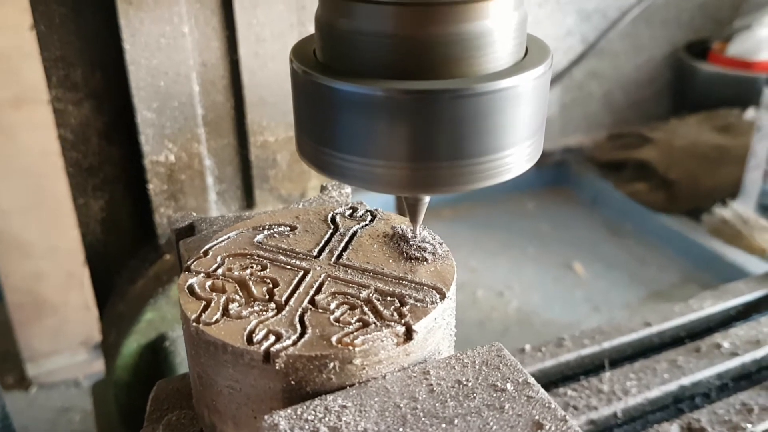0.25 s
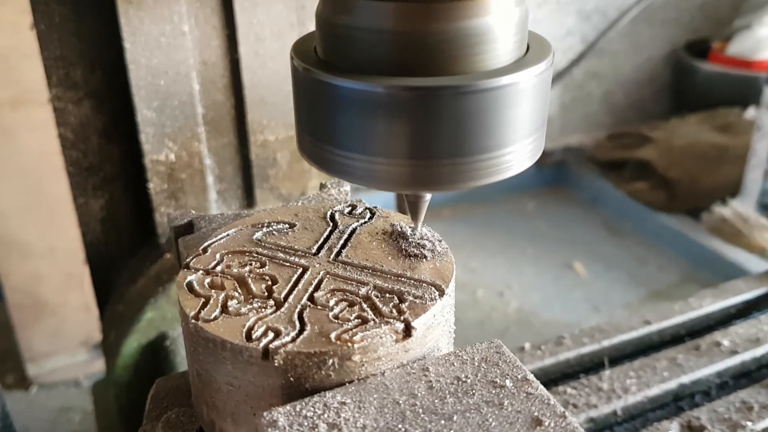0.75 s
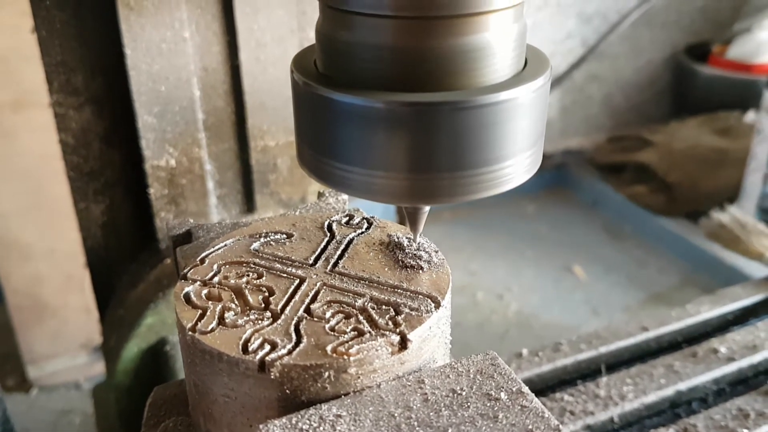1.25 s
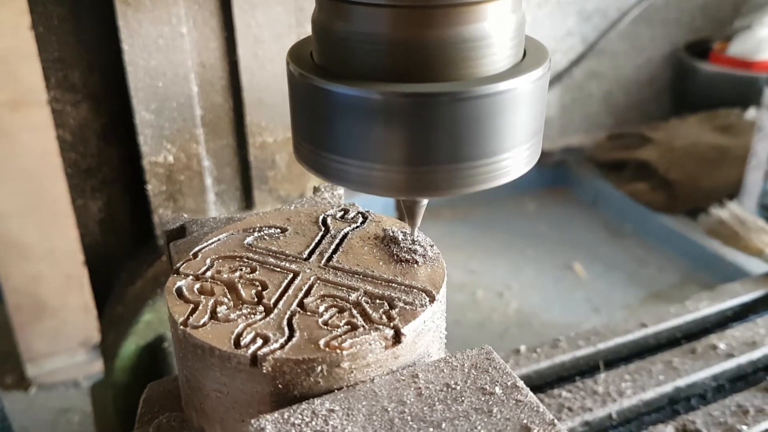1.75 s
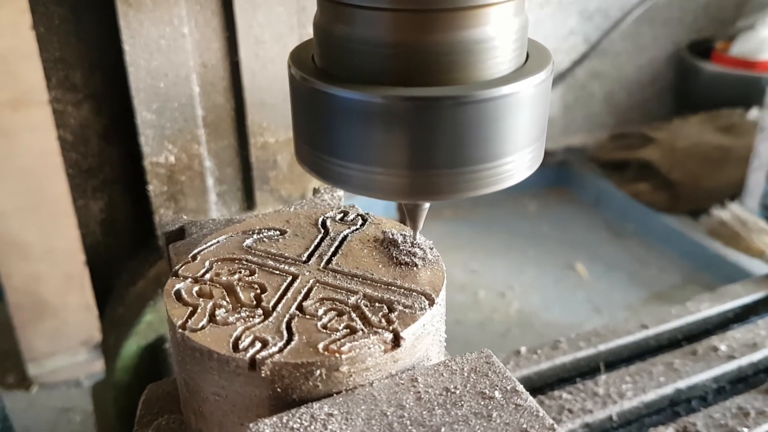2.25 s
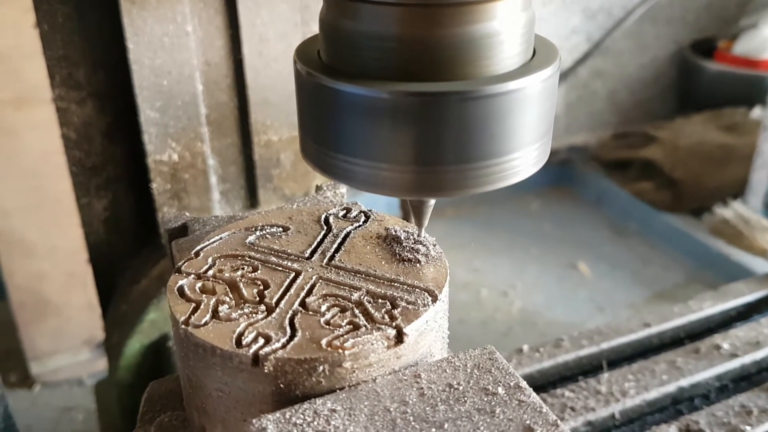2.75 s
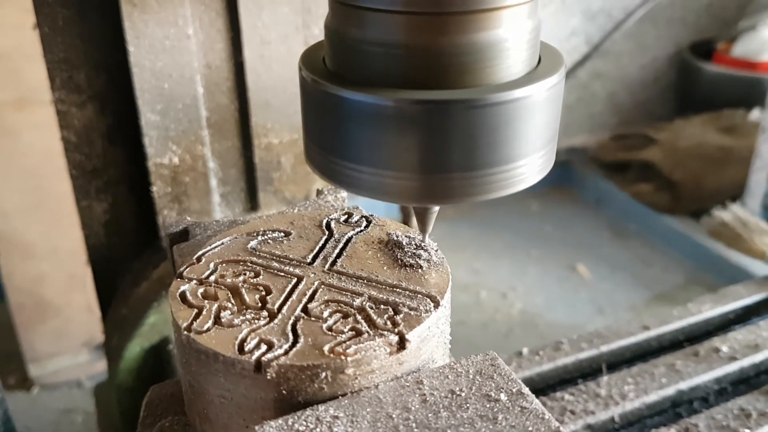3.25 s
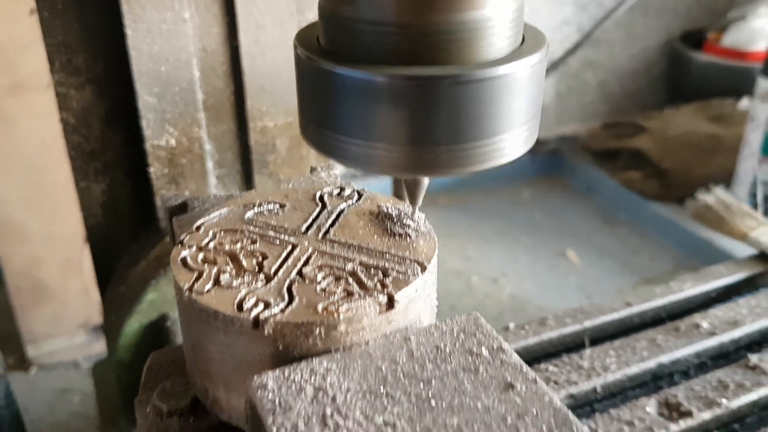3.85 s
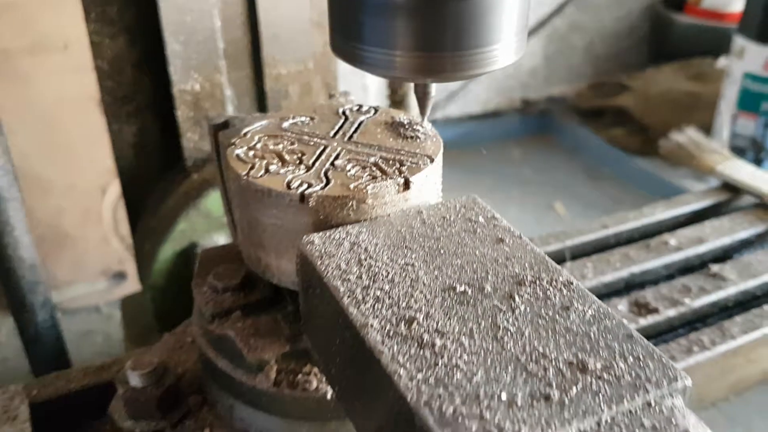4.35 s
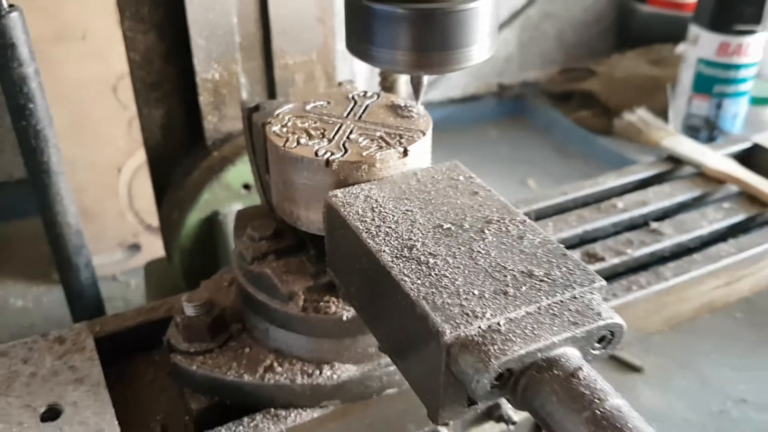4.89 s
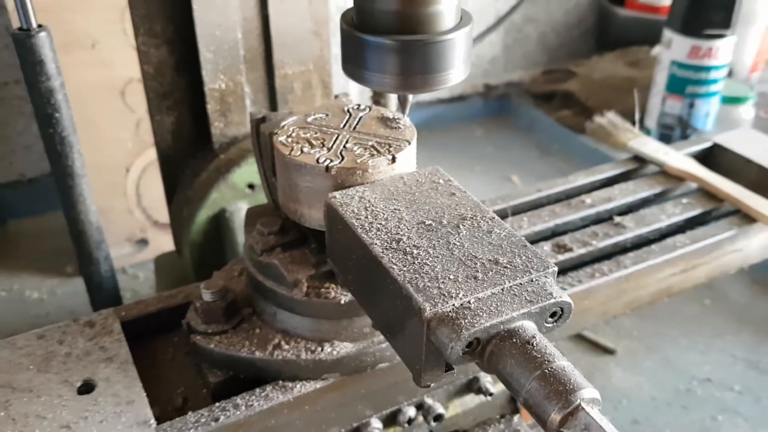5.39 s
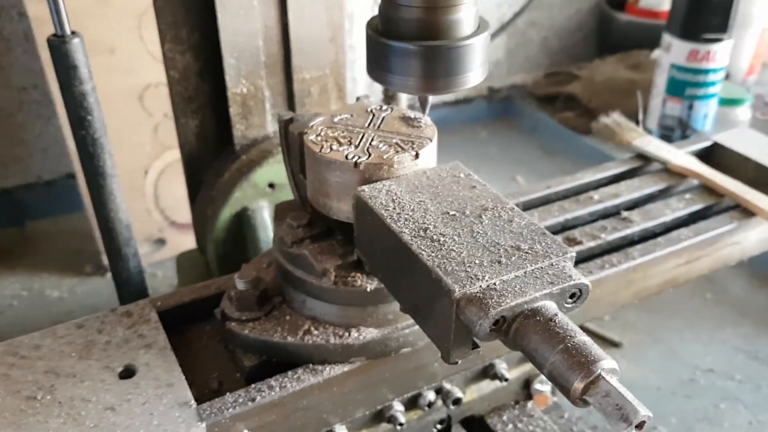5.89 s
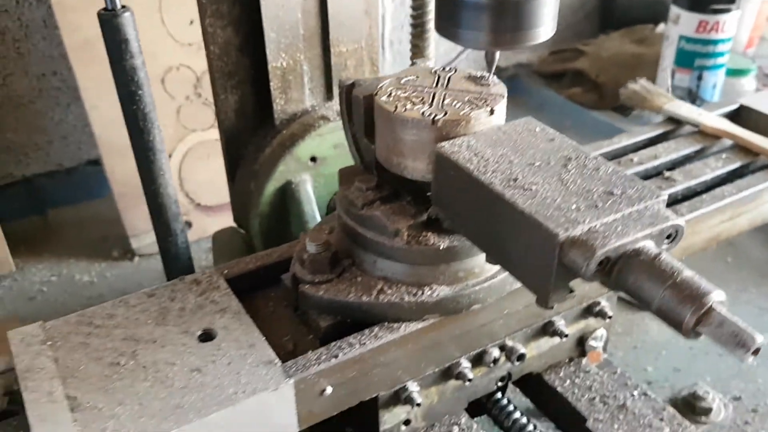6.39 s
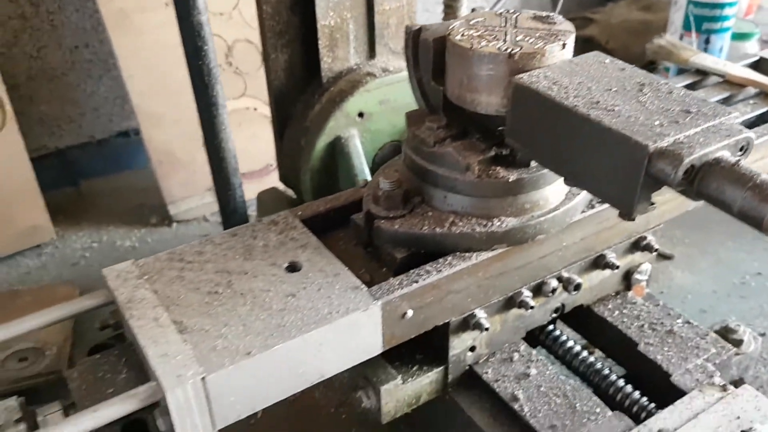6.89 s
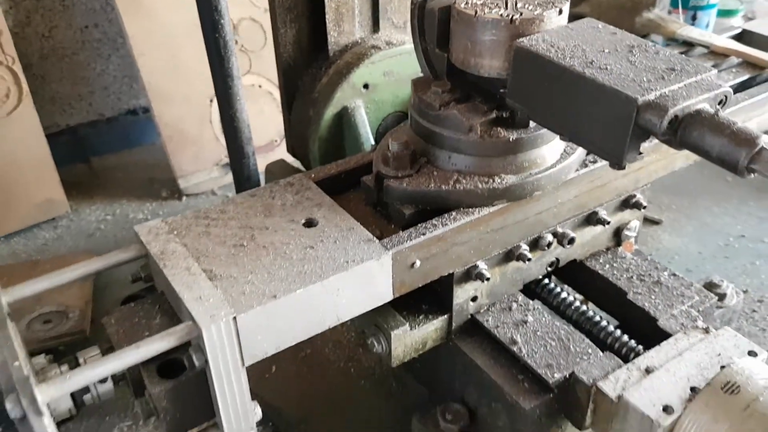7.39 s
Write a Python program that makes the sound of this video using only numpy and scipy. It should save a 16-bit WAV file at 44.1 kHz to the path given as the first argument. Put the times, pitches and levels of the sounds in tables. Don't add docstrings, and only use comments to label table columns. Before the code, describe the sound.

Close machine drone in a small workshop: ringing spindle gears, low hum, fluttering high cutter squeal, shifting as the listener backs away, ending with rattling knocks.

```python
import sys
import numpy as np
from scipy import signal
from scipy.fft import irfft
from scipy.io import wavfile
from scipy.ndimage import uniform_filter1d, map_coordinates

SR = 44100
rng = np.random.default_rng(int(sys.argv[2]) if len(sys.argv) > 2 else 0)


def gain_from_decibels(decibels):
    exponent = np.asarray(decibels, float) / 20
    return 10 ** exponent


def to_wav(s):
    ch = np.atleast_2d(s).T
    pcm = np.round(np.clip(ch, -1, 1) * 32767)
    wavfile.write(sys.argv[1], SR, pcm.astype(np.int16))


N = 336483

MESH_HZ, SHAFT_HZ = 329.3, 28.0
WALK_S = 3.5


def evened(x):
    return x / np.sqrt(np.mean(x ** 2) + 1e-20)


def read(points, hz):
    f, value = np.transpose(points)
    return np.interp(np.log(hz + 1), np.log(f + 1), value)


def curves(rows, t):
    s, *columns = np.transpose(rows)
    return [np.interp(t, s, c) for c in columns]


def spells(rows, t, edge_s):
    gates = []
    for a, b, value in rows:
        gate = np.interp(t, [a - edge_s, a + edge_s, b - edge_s, b + edge_s], [0, 1, 1, 0])
        gates.append((gate, value))
    return gates


def wander(hz, t, count=12):
    f = np.geomspace(hz / 8, hz, count)[:, None]
    phase = rng.random((count, 1))
    few = np.linspace(0, t[-1], num=1500)
    waves = np.sin(2 * np.pi * (f * few + phase)) / np.sqrt(f)
    return np.interp(t, few, evened(waves.sum(0)))


def sine(turns):
    return np.sqrt(2) * np.cos((2 * np.pi * (turns % 1)).astype(np.float32))


def spindle_time(t):
    # time in seconds, offset in parts per thousand.
    speed_drift = [(0.0, -0.14), (0.7, -0.046), (1.4, -0.027), (2.0, -0.15), (2.5, 0.039), (2.95, 0.033),
                   (3.15, 0.121), (3.4, 0.465), (3.7, -0.088), (4.1, 0.166), (4.5, 0.308), (4.9, 0.096),
                   (5.3, 0.492), (5.7, 0.571), (6.2, 1.154), (6.7, 1.225), (7.2, 1.189), (7.63, 0.641)]
    hunting = 0.14 * np.cos(2 * np.pi * 0.8 * (t - 1.6))
    hunting = hunting * np.clip(1 + WALK_S - t, 0, 1)
    return np.cumsum(1 + (curves(speed_drift, t)[0] + hunting) / 1000) / SR


def gears(t):
    # pitch in Hz, delay left and right in ms, slip left and right in Hz while walking.
    strong_tones = [(630.7, 1.375, 1.575, -0.02, 0.0), (686.63, 1.03, 0.813, -0.06, -0.08),
                    (1618.67, 0.495, 0.458, -0.01, -0.17), (1621.48, 0.513, 0.494, -0.06, 0.04),
                    (1674.6, 0.48, 0.289, 0.02, 0.29), (1677.48, 0.251, 0.034, -0.12, 0.2),
                    (1730.55, 0.38, 0.562, -0.01, -0.09), (1947.98, 0.067, 0.075, -0.06, -0.1),
                    (2333.25, 0.103, 0.032, -0.01, -0.1), (2606.64, 0.277, 0.218, -0.13, 0.09),
                    (2662.58, 0.114, 0.172, -0.19, 0.14), (3180.69, 0.102, 0.211, -0.15, -0.11),
                    (3265.31, 0.139, 0.02, -0.17, -0.07), (3321.24, 0.123, 0.126, -0.04, 0.07),
                    (3377.19, 0.087, 0.283, -0.2, -0.21), (3405.85, 0.172, 0.263, -0.28, -0.13),
                    (2003.95, 0.229, 0.065, 0.37, 0.06), (2277.31, 0.306, 0.192, 0.05, -0.07),
                    (2935.96, 0.204, 0.158, -0.05, 0.02), (3356.29, 0.183, 0.084, -0.27, -0.11),
                    (4967.86, 0.171, 0.125, 0.13, -0.2)]
    # level in dB, echo strength (0-1), seconds of walking until
    # the echo cancels it, seconds between cancellings, trend in dB per second.
    left_ear = [(-29.0, 0.22, 0.52, 1.23, -2.0), (-34.6, 0.25, 0.53, 4.06, 2.0),
                (-32.9, 0.17, 0.78, 1.9, -0.8), (-44.0, 0.49, 1.96, -4.24, 1.4),
                (-29.4, 0.44, 0.68, -4.36, -2.7), (-35.6, 0.45, 1.11, -4.51, -2.9),
                (-42.8, 0.48, 1.83, 2.88, -0.9), (-41.3, 0.9, 3.27, 8.33, 0.3),
                (-27.4, 0.54, 0.55, 6.75, -4.4), (-33.5, 0.46, 0.97, 2.2, -0.9),
                (-33.1, 0.66, 1.37, 2.44, -0.0), (-28.0, 0.56, 1.34, 8.33, -2.9),
                (-42.1, 0.47, 4.07, -8.33, 1.1), (-27.9, 0.9, 2.48, -8.33, 2.3),
                (-43.1, 0.56, 2.43, -2.67, -1.6), (-42.5, 0.67, 2.54, 3.73, -0.1),
                (-46.9, 0.49, 1.44, -1.76, -1.9), (-39.4, 0.75, 1.78, 5.29, -1.9),
                (-39.6, 0.69, 2.4, 8.33, -1.4), (-39.7, 0.38, 1.2, 1.29, -2.5),
                (-56.5, 0.7, 0.39, 1.84, 0.1)]
    right_ear = [(-30.2, 0.2, 0.5, 1.23, -0.6), (-30.6, 0.44, 2.0, 3.83, -0.3),
                 (-36.1, 0.94, 1.47, 7.14, -0.3), (-34.5, 0.44, 0.67, 2.16, 2.2),
                 (-40.0, 0.32, 1.2, -1.43, 3.0), (-34.1, 0.86, 0.69, 8.33, -2.0),
                 (-38.6, 0.68, 2.78, 3.57, -3.4), (-43.0, 0.72, 3.46, 8.33, -1.4),
                 (-35.7, 0.95, 1.06, 1.39, -1.6), (-23.8, 0.2, 2.75, 2.85, -1.4),
                 (-24.4, 0.25, 2.5, -2.73, -2.1), (-39.0, 0.57, 3.66, -8.33, 2.7),
                 (-28.9, 0.26, 2.56, -3.0, -2.8), (-25.9, 0.97, 0.65, 8.33, -0.3),
                 (-30.4, 0.4, 0.87, 1.14, -4.8), (-29.4, 0.39, 0.67, 2.6, -1.6),
                 (-47.9, 0.86, 3.0, 8.33, 2.1), (-39.1, 0.44, 1.35, 3.24, -1.4),
                 (-46.0, 0.47, 1.08, -2.33, 1.2), (-30.1, 0.57, 0.67, 6.13, -5.0),
                 (-42.9, 0.65, 1.84, -8.33, -0.7)]
    # strength (0-1), seconds of walking until # it cancels,
    # seconds between cancellings.
    left_far_wall = [(0.3, 0.07, 0.92), (0.15, 0.99, 1.52), (0.11, 1.33, -1.42), (0.51, 1.1, 1.65),
                     (0.2, 1.38, -1.9), (0.29, 1.34, 2.06), (0.32, 0.87, 1.57), (0.28, 1.62, 2.12),
                     (0.28, 1.06, 1.49), (0.4, 1.7, -2.15), (0.19, 0.56, 0.85), (0.17, 1.25, 1.78),
                     (0.29, 1.33, 2.31), (0.14, 1.42, 1.53), (0.84, 1.85, 5.0), (0.31, 0.55, -1.17),
                     (0.81, 0.8, 5.0), (0.53, 1.77, 1.91), (0.17, 0.2, -1.1), (0.43, 2.24, 4.42),
                     (0.7, 1.41, -1.58)]
    right_far_wall = [(0.31, 0.02, 0.95), (0.17, 2.15, -2.61), (0.9, 1.18, 1.97), (0.13, 1.79, -1.84),
                      (0.52, 3.22, -4.12), (0.63, 2.73, -4.03), (0.34, 1.29, 1.54), (0.71, 1.44, 2.2),
                      (0.3, 0.54, -1.53), (0.11, 0.62, -0.8), (0.24, 2.4, 3.55), (0.45, 1.27, 2.46),
                      (0.25, 0.19, 1.29), (0.75, 2.35, -5.0), (0.48, 0.78, 3.38), (0.21, 0.12, -1.6),
                      (0.9, 1.75, 2.87), (0.22, 0.68, -1.37), (0.57, 0.37, 2.05), (0.18, 0.72, 0.83),
                      (0.21, 1.32, 1.33)]
    # time in seconds, level in dB.
    cutting_load = [(0, -0.5), (3.3, 1), (3.9, .8), (4.3, 5), (4.7, 2.5), (5.3, -9.5), (6, 2), (6.35, 3.5),
                    (7, 1.5), (7.3, -4.5), (7.63, -8)]
    # start and end in seconds,
    # moment in step in seconds, beats per second, level in dB.
    whine_beats = [
        (-.1, 2.85, 1.47, 1.03, -38.5),
        (5.65, 6.3, 5.99, 5.2, -34.5),
    ]

    shaft_t = spindle_time(t)
    coarse = t[::256]
    walked = np.maximum(coarse - WALK_S, 0)
    load, = curves(cutting_load, coarse)
    pair = 0.18 * load + 2.5 * np.clip(1 - coarse / 3.3, 0, 1)
    load_db = {0: 1.53 - 0.43 * load, 13: load, 2: pair, 3: pair, 8: 0.9 * walked}

    out = np.zeros((2, N))
    left, right = zip(left_ear, left_far_wall), zip(right_ear, right_far_wall)
    for number, ((hz, *path), *ears) in enumerate(zip(strong_tones, left, right)):
        delays_ms, slips_hz = path[:2], path[2:]
        for ear, ((db, *floor, trend_db), wall) in enumerate(ears):
            paths = 1
            for echo, null_s, every_s in (floor, wall):
                paths = paths - echo * np.exp(2j * np.pi * (walked - null_s) / every_s)
            lead = np.unwrap(np.angle(paths)) / (2 * np.pi)
            lead = lead + slips_hz[ear] * walked - hz * delays_ms[ear] / 1000
            level_db = db + 0.9 + trend_db * walked + load_db.get(number, 0)
            gain = abs(paths) * gain_from_decibels(level_db + 0.4 * wander(5.0, coarse))
            out[ear] += np.interp(t, coarse, gain) * sine(hz * shaft_t + np.interp(t, coarse, lead))
    for a, b, step_s, beats, db in whine_beats:
        gate = spells([(a, b, db)], t, 0.12)[0][0]
        out += gate * gain_from_decibels(db) * sine(strong_tones[0][0] * shaft_t + beats * (t - step_s))
    return out + sidebands(shaft_t, np.maximum(t - WALK_S, 0))


def sidebands(shaft_t, walked):
    # pitch in Hz, level left and right in dB,
    # delay left and right in ms.
    faint_low = [(503.76, -42.1, -42.0, 1.765, 1.781), (521.17, -45.1, -45.1, 1.623, 1.661),
                 (530.93, -41.4, -39.0, 0.429, 0.433), (571.81, -44.4, -45.3, 1.079, 1.072),
                 (612.6, -44.6, -45.8, 0.291, 0.292), (658.61, -39.9, -40.7, 0.775, 0.871),
                 (687.8, -50.2, -44.2, 1.229, 1.015), (741.38, -49.5, -47.2, 0.13, 0.293),
                 (742.56, -47.5, -44.9, 0.588, 0.502), (761.23, -51.2, -44.6, 0.873, 1.143),
                 (824.82, -45.1, -46.4, 0.903, 1.122), (1015.93, -45.5, -49.5, 0.635, 0.955),
                 (1452.15, -47.0, -46.9, 0.179, 0.175), (1512.62, -43.8, -55.5, 0.498, 0.532),
                 (1592.7, -41.9, -40.1, 0.564, 0.501), (1702.55, -47.5, -45.9, 0.348, 0.244),
                 (1715.42, -46.6, -46.9, 0.058, 0.327), (1759.25, -43.9, -44.1, 0.215, 0.513),
                 (1762.11, -46.2, -47.5, 0.409, 0.14), (1931.01, -47.6, -47.9, 0.359, 0.293),
                 (1951.36, -49.4, -46.5, 0.443, 0.505), (1973.32, -50.2, -46.6, 0.339, 0.187),
                 (2249.38, -48.6, -47.3, 0.383, 0.159), (2281.34, -47.8, -45.6, 0.399, 0.303),
                 (2354.69, -42.9, -43.6, 0.028, 0.032), (2545.38, -46.2, -48.5, 0.078, 0.303),
                 (2550.68, -56.4, -43.8, 0.056, 0.26), (2578.69, -61.8, -40.6, 0.328, 0.275),
                 (2593.99, -44.1, -38.6, 0.189, 0.176), (2608.38, -51.4, -46.2, 0.236, 0.2),
                 (2621.75, -44.7, -43.1, 0.266, 0.266), (2637.14, -48.0, -39.9, 0.269, 0.259),
                 (2647.49, -50.0, -42.9, 0.324, 0.308), (2667.26, -49.6, -44.0, 0.292, 0.367),
                 (2691.23, -54.2, -41.9, 0.294, 0.332)]
    faint_upper = [(2693.08, -43.6, -41.6, 0.062, 0.169), (2703.43, -45.2, -46.0, 0.168, 0.277),
                   (2718.57, -41.1, -44.9, 0.33, 0.145), (2734.55, -43.0, -43.7, 0.046, 0.227),
                   (2769.2, -47.1, -42.6, 0.117, 0.116), (2770.55, -52.4, -45.4, 0.136, 0.008),
                   (2941.13, -40.5, -46.1, 0.083, 0.059), (2991.85, -49.2, -48.0, 0.183, 0.086),
                   (2997.15, -45.0, -58.6, 0.268, 0.187), (3008.0, -47.9, -41.3, 0.322, 0.043),
                   (3124.75, -47.0, -50.7, 0.167, 0.056), (3209.37, -45.7, -42.8, 0.008, 0.182),
                   (3224.43, -50.2, -46.3, 0.28, 0.119), (3236.63, -43.0, -42.3, 0.283, 0.105),
                   (3250.92, -45.4, -53.0, 0.138, 0.254), (3271.11, -48.9, -43.4, 0.11, 0.277),
                   (3272.71, -44.1, -46.8, 0.07, 0.173), (3280.36, -39.4, -47.7, 0.196, 0.264),
                   (3306.1, -40.2, -40.0, 0.11, 0.27), (3314.01, -43.9, -38.1, 0.289, 0.15),
                   (3320.07, -44.5, -46.9, 0.219, 0.179), (3322.42, -44.7, -48.5, 0.22, 0.164),
                   (3327.05, -39.8, -49.2, 0.252, 0.181), (3336.22, -45.6, -40.3, 0.075, 0.265),
                   (3349.17, -37.6, -42.7, 0.21, 0.063), (3355.14, -47.7, -45.2, 0.204, 0.081),
                   (3362.04, -48.5, -36.5, 0.206, 0.153), (3391.48, -45.0, -43.4, 0.004, 0.149),
                   (3461.8, -53.1, -37.3, 0.281, 0.095), (3496.87, -52.3, -46.6, 0.012, 0.16),
                   (3923.92, -42.5, -41.2, 0.148, 0.244), (3979.86, -46.4, -48.5, 0.021, 0.123),
                   (4007.87, -46.8, -50.8, 0.138, 0.013), (4116.37, -53.4, -46.0, 0.068, 0.22)]
    # pitch in Hz, level in dB a line.
    comb_levels = [(400, -59), (1300, -55), (1900, -57), (3400, -57), (4600, -56), (5700, -58), (7000, -58),
                   (8200, -64.5), (9000, -83)]

    size = 2 ** 19
    order, split = np.meshgrid(np.arange(1, 28), np.arange(-5, 7))
    comb_hz = (order * MESH_HZ + split * SHAFT_HZ).ravel()
    spread = rng.standard_normal((2, len(comb_hz)))
    comb_turns = rng.random((2, len(comb_hz)))
    faint = np.transpose(list(faint_low) + list(faint_upper))
    hz = np.r_[faint[0], comb_hz]
    turns = np.c_[-faint[0] * faint[3:] / 1000, comb_turns]
    level_db = np.c_[faint[1:3], read(comb_levels, comb_hz) + 3.0 * spread]
    gains = gain_from_decibels(level_db) * np.exp(2j * np.pi * turns)

    still, smeared = np.zeros((2, 2, size // 2 + 1), complex)
    at = np.round(hz * size / SR).astype(int)
    np.add.at(still, (slice(None), at), gains)
    for step in range(-9, 10):
        chance = np.exp(2j * np.pi * rng.random(gains.shape))
        np.add.at(smeared, (slice(None), at + step), gains * chance / np.sqrt(19))
    heard = []
    for lines in (still, smeared):
        waves = irfft(lines) * size / np.sqrt(2)
        heard.append(np.array([map_coordinates(x, [shaft_t * SR], order=2) for x in waves]))
    moving = np.clip(0.21 + 0.5 * (walked - 0.4), 0.1, 1)
    return (np.sqrt(1 - moving ** 2) * heard[0] + moving * heard[1]) * gain_from_decibels(-1.1 * walked)


def squeal(t):
    # start in seconds, pitch in Hz, level left and right in dB, flutters per second.
    strokes = [(0, 9100, -36, -47, 11), (.88, 9113, -33.5, -43, 13), (1.27, 9102, -34.5, -42, 12),
               (1.84, 9105, -35.5, -50, 8.4), (3.4, 9092, -30, -46, 10.4), (4.02, 9096, -34.5, -50, 17.5),
               (4.47, 9110, -38, -48, 21), (5.02, 9101, -34, -45, 10.7), (5.62, 9100, -35.5, -51, 14),
               (6.06, 9114, -27, -31.5, 14.4), (6.34, 9101, -34, -45, 11.7), (7.03, 9121, -24.5, -52, 10.8)]
    null_hz, null_reach_hz, free_s = 9103, 22, 7.03

    start, *columns = np.transpose(strokes)
    stroke = np.clip(np.searchsorted(start, t) - 1, 0, None)
    hz, left_db, right_db, pace = (uniform_filter1d(c[stroke], size=900) for c in columns)
    depth = np.clip(1 - abs(hz - null_hz) / null_reach_hz, 0.1, 1)
    beats = 2 * np.pi * np.cumsum(pace * (1 + 0.108 * wander(4.0, t))) / SR
    warble_hz = 16 * np.tanh(3.0 * np.sin(2 * np.pi * 9.6 * (t - 7.095))) * (t > free_s)
    turns = np.cumsum(hz + warble_hz) / SR
    left_db = left_db - 8.5 * np.maximum(t - free_s, 0)
    out = []
    for db, lag in ((left_db, 0), (right_db, 2.4)):
        flutter = 0.49 * np.cos(beats - lag) + 0.52 * np.cos(2 * beats)
        grip = 1 + depth * (flutter + 0.44 * wander(40.0, t, count=30))
        out.append(gain_from_decibels(db) * grip * sine(turns + 0.12 * lag))
    return np.array(out)


def knocks():
    # pitch ratio, level in dB, seconds to fall by 60 dB.
    modes = ((.42, -5, .035), (.96, -1, .045), (1.06, 0, .06), (1.22, -6, .025), (1.8, -7, .03))
    out, t = np.zeros((2, N)), np.arange(3000) / SR
    times = 7.097 + 0.0517 * np.arange(9)
    for s, (pitch, side) in zip(times, rng.uniform(-0.61, 1, (9, 2))):
        db = -22 - 170 * (s - 7.33) ** 2
        pan_db = -3 + 2.1 * side
        knock_hz = 980 * (1 + 0.008 * pitch)
        ring = sum(gain_from_decibels(d - 60 * t / t60) * np.sin(2 * np.pi * knock_hz * k * t) for k, d, t60 in modes)
        at = round(s * SR)
        ears = gain_from_decibels([[db + pan_db / 2], [db - pan_db / 2]])
        out[:, at:at + len(t)] += ears * ring * np.minimum(t / 0.001, 1)
    return out


def motors(t):
    # time in seconds, level in dB.
    hum_level = [(0, -30.5), (1, -34), (2.8, -33.5), (3.4, -31.5), (5.6, -33), (6.3, -36.5), (7.1, -37.5),
                 (7.63, -34)]
    # start and end in seconds, level in dB.
    third_surges = [
        (.85, 3.37, -44),
        (5.7, 6.4, -34),
    ]
    # start and end in seconds, level in dB.
    pump_surges = [
        (-.1, 1.1, -43.5),
        (3.1, 7.25, -42.5),
    ]
    # pitch in Hz, level in dB.
    steady_tones = [(93, -42), (140.6, -46.5), (451.5, -59), (490.6, -46), (1346.5, -67)]
    # start and end in seconds, moment in step
    # in seconds, beats per second, level in dB.
    feed_beats = [
        (.35, .98, 0.64, 4.7, -35),
        (1.755, 3.25, 2.44, 3.1, -31.5),
    ]
    # start and end in seconds, first and last pitch in Hz, level in dB.
    feed_moves = [(0, 0.49, 157, 175, -38.5), (0.5, 0.98, 164.8, 160, -37.5), (0.5, 1.9, 119, 110, -46),
                  (2.9, 3.108, 134.5, 138.2, -35), (1.6, 3.4, 155.8, 157, -39.5),
                  (0.7, 3.05, 274, 280, -42), (3.5, 4.9, 194.7, 190, -40.5), (3.5, 4.898, 96, 96, -38.5),
                  (5, 6.0, 280, 282, -46), (5.899, 6.805, 113.5, 109, -48), (5.5, 6.9, 232.3, 240, -39.5),
                  (6, 6.9, 421, 421, -45.5), (-0.5, 2.9, 380.5, 380.5, -47.5)]
    hum_hz, pump_hz, surge_edge_s = 70.2, 252.2, 0.12

    first, = curves(hum_level, t)
    third = gain_from_decibels(-42.5) + sum(gate * gain_from_decibels(db) for gate, db in spells(third_surges, t, surge_edge_s))
    pump = gain_from_decibels(-46.5) + sum(gate * gain_from_decibels(db) for gate, db in spells(pump_surges, t, surge_edge_s))
    out = gain_from_decibels(first + 0.7 * wander(10.5, t)) * sine(hum_hz * t)
    out += third * gain_from_decibels(1.5 * wander(9.0, t)) * sine(3 * hum_hz * t)
    out += pump * sine(pump_hz * t)
    for hz, db in steady_tones:
        out += gain_from_decibels(db + 2.5 * wander(3.0, t)) * sine(hz * t)
    for a, b, step_s, beats, db in feed_beats:
        gate = np.interp(t, [a, a + 0.19, b - 0.1, b], [0, 1, 1, 0])
        out += gate * gain_from_decibels(db) * sine(hum_hz * t + beats * (t - step_s))
    for a, b, hz, end_hz, db in feed_moves:
        glide_hz = np.interp(t, [a, b], [hz, end_hz]) + 1.6 * wander(5.5, t, count=5)
        gate = np.interp(t, [a - 0.06, a + 0.044, b - 0.06, b + 0.087], [0, 1, 1, 0])
        out += gate * gain_from_decibels(db) * sine(np.cumsum(glide_hz) / SR)
    return np.array([gain_from_decibels(-1.5) * out, np.roll(out, -12)])


def roar():
    # pitch in Hz, level in dB per Hz.
    noise_levels = [(25.0, -40), (60.0, -6), (150.0, 5), (350.0, 0), (520.0, 3), (1000.0, -4.5),
                    (1350.0, -5), (2000.0, -4.5), (3000.0, -0.5), (4000.0, -7.5), (6000.0, -7.5),
                    (9800.0, -13.5), (14000.0, -6), (16000.0, -10)]
    # pitch in Hz, width in Hz, level near and
    # far in dB.
    casing_peaks = [(418, 53, -6.5, -0.5), (524, 27, 2.5, -2.5), (678, 76, 6.5, 10.5), (776, 27, 4, 3),
                    (1006, 40, 7, 6), (1220, 22, -2, 1), (1393, 42, -22, -10), (1503, 67, 11.5, 8.5),
                    (1654, 39, -11, 10.5), (2010, 61, 7, 6), (2090, 63, -2, -7), (2260, 40.0, -3, 3),
                    (2470, 60.0, 1.5, 1), (2570, 40.0, -3, 4.5), (2540, 83, 3, 2), (2960, 40.0, -1.5, 2.5),
                    (3150, 40.0, 1, -2.5), (3250, 240, 2, 4), (3540.0, 47, 4.5, 5), (3670, 50, 4.5, 1),
                    (3650, 61, 1, -11), (3950, 180, -6, 3), (4300, 35, -2, 5), (5110, 82, -1, 8),
                    (5630, 104, 3, 6.5), (5900.0, 150, 7, 4.5), (6240, 280, 2, 2), (7340, 110, -9, -1),
                    (8100, 150.0, 5, 5), (8840, 150.0, -4.5, 1.5), (9100.0, 130, 11.5, 11),
                    (9600, 200.0, -1, 3), (10000, 350, -1, -2.5), (11500.0, 600.0, 1.4, 1.4),
                    (2500.0, 2400, 2, 1.05)]
    # pitch in Hz, likeness (0-1).
    ear_likeness = [(60, .98), (250, .97), (500, .95), (1000, .8), (2500, .5), (5000, .25), (12000, .03)]
    # pitch in Hz, left minus right in dB.
    ear_balance = [(60, -1.0), (180, 0), (550, -2.5), (1650, -4.5), (4970, -6), (9000, -1), (15000, -1.2)]
    # start and end in seconds, level in dB.
    rumble_lulls = [
        (.3, 2.2, -1.5),
        (3.15, 5.04, -8),
        (6.1, 7.7, -5.5),
    ]
    # time in seconds, pitch in Hz, level
    # in dB.
    chip_hiss = [
        (4.0, 5800, -4),
        (4.7, 5820, 8),
        (5.9, 5820, 9),
        (6.7, 5660, 6.5),
    ]
    shaft_pulses = [(1, .05, 0), (2, .08, .35), (MESH_HZ / SHAFT_HZ, .04, 0)]

    frames, hz = N // 256 + 5, np.fft.rfftfreq(1024, 1 / SR)[:, None]
    t = np.arange(frames) * 256 / SR
    a, b, c, d, patches = rng.standard_normal((frames, 513, 5)).T
    patches = evened(uniform_filter1d(uniform_filter1d(patches, 10, 0), 20, 1))
    ripple = evened(uniform_filter1d(rng.standard_normal((513, 1)), 2, 0))
    field_db = read(noise_levels, hz) + patches + 1.1 * ripple
    far = np.clip((t - 3.8) / 1.2, 0, 1)
    for f, width, near_db, far_db in casing_peaks:
        field_db = field_db + (near_db + far * (far_db - near_db)) / (1 + ((hz - f) / width) ** 2)

    low = 1 / (1 + ((hz - 328) / 83) ** 4)
    high = 1 / (1 + (6500 / (hz + 1)) ** 4)
    rumble = 0.5 + sum(gate * db for gate, db in spells(rumble_lulls, t, 0.055))
    body = 1.5 * np.exp(-t / 0.4)
    fizz = 2.0 - 0.73 * np.maximum(t - WALK_S, 0)
    field_db = field_db + low * rumble + (1 - low - high) * body + high * fizz
    field_db = field_db + 4.5 * (t < 0.93) / (1 + ((hz - 1050) / 90) ** 4)
    scrape_hz, scrape_db = curves(chip_hiss, t)
    field_db = field_db + scrape_db / (1 + ((hz - scrape_hz) / 110) ** 2)
    field_db = field_db - 1.4 * (hz < 230) * np.maximum(t - 5.5, 0)

    same = np.clip(read(ear_likeness, hz), -1, 1)
    left = a + 1j * b
    right = same * left + np.sqrt(1 - same ** 2) * (c + 1j * d)
    balance = gain_from_decibels(read(ear_balance, hz) / 2)
    spectrum = np.array([left * balance, right / balance]) * gain_from_decibels(field_db)
    noise = evened(signal.istft(spectrum, nperseg=1024, noverlap=768)[1][:, :N])
    turns = 27.97 * spindle_time(np.arange(N) / SR)
    pulse = 1 + sum(depth * sine(k * turns + lead) for k, depth, lead in shaft_pulses)
    return gain_from_decibels(-25.0) * noise * pulse


def scene():
    t = np.arange(N) / SR
    return gears(t) + squeal(t) + knocks() + motors(t) + roar()


def roll_off(x):
    return signal.sosfilt(signal.butter(12, 15900, fs=SR, output="sos"), x)


def record(dry):
    low_pass = signal.firwin(2001, 15870, window=("kaiser", 9), fs=SR)
    limited = signal.oaconvolve(dry, low_pass[None], "same")
    return roll_off(limited)


dry = scene()
out = record(dry)
to_wav(out)
```